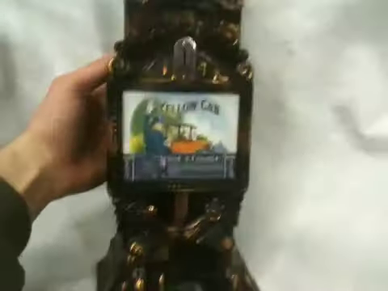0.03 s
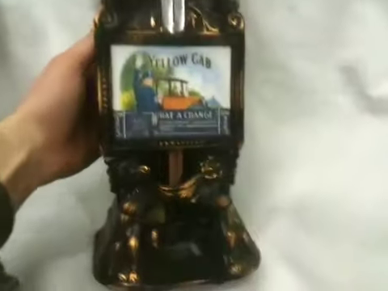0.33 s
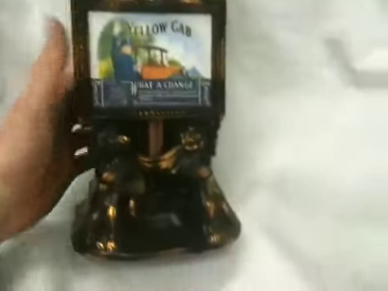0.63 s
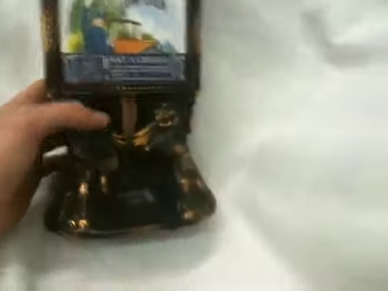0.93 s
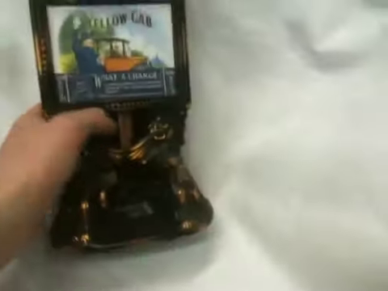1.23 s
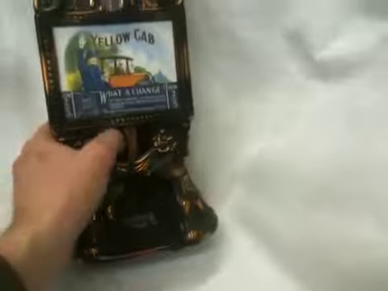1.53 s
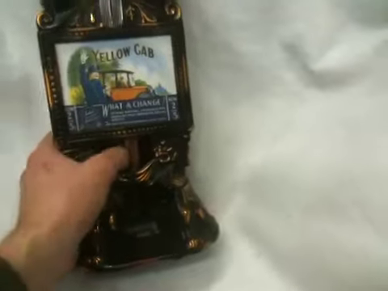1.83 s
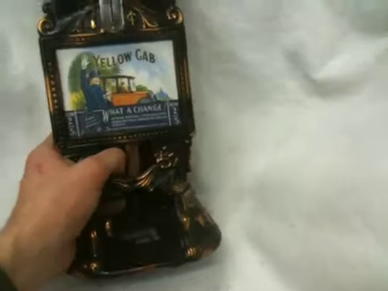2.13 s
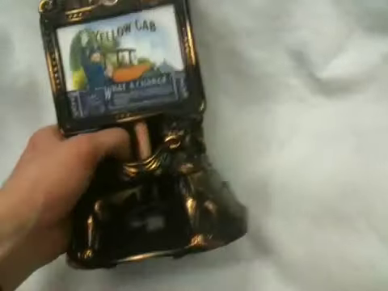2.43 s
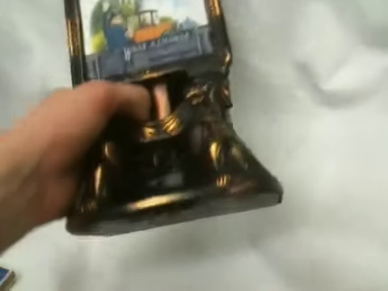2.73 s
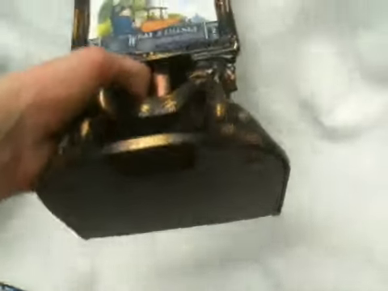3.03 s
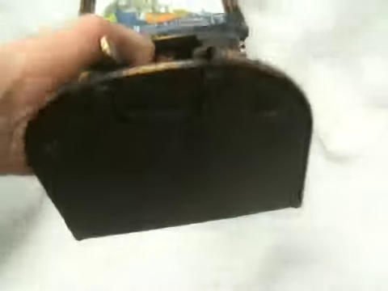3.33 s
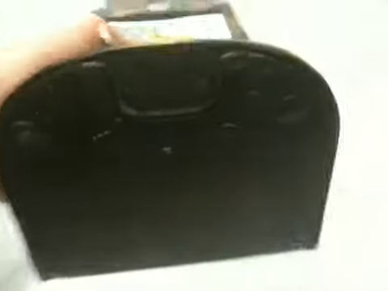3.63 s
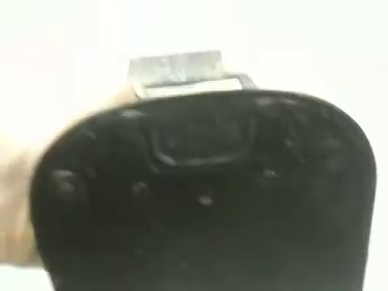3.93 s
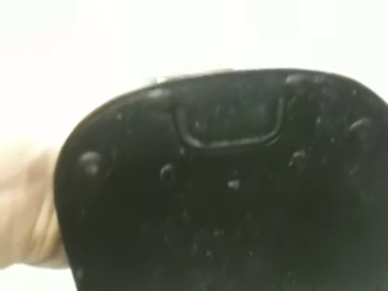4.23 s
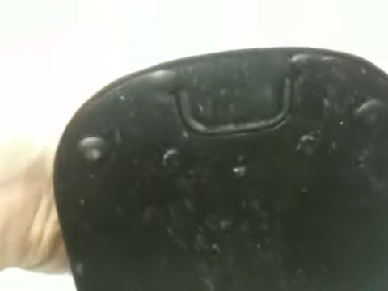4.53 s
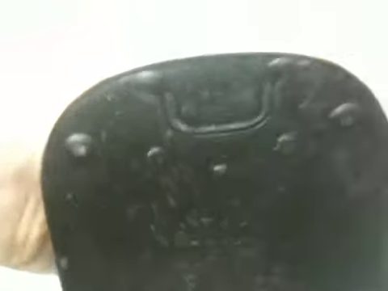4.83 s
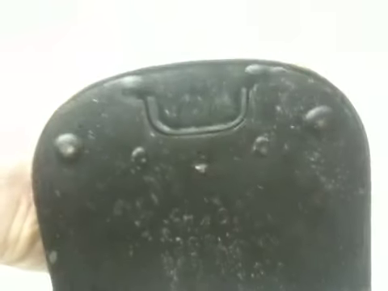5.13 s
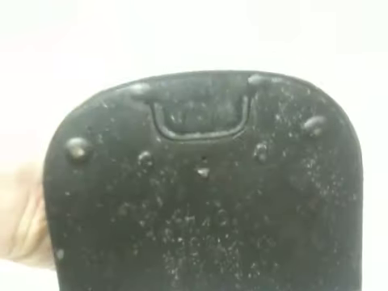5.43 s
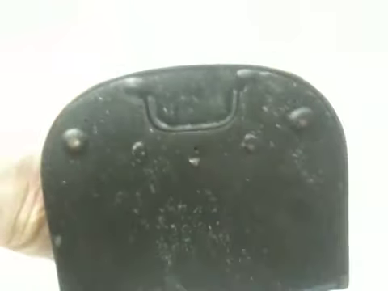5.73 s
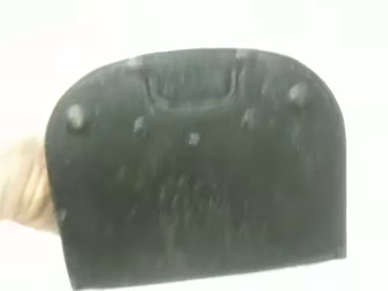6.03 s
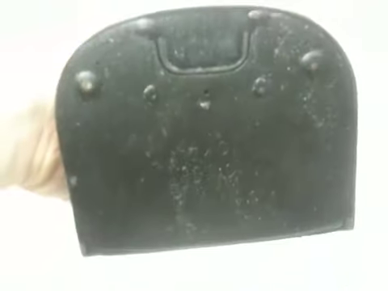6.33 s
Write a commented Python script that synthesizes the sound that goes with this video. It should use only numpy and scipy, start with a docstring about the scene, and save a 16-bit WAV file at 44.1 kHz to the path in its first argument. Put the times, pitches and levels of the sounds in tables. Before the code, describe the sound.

Close to the microphone, a quick metallic rattle comes from inside a small vending machine as someone handles it. Fingers rub and knock lightly on the hollow body. As it tilts, loose steel pieces click and chatter in two bursts, then a heavier part lands with a ringing clunk, the loudest sound. A faint fan and electrical hum run underneath in the small, quiet room.

```python
"""Tipping an old vending machine

An old cast-metal vending machine is gripped and tipped over by hand in a small quiet room.
Loose steel parts inside slide, clink and bounce; at last a heavier piece drops with a hollow clunk.
Fingers bump and rub on the metal body, over a faint fan and mains hum."""
import sys
import numpy as np
from scipy import signal
from scipy.fft import rfft, irfft
from scipy.io import wavfile

SR = 44100
rng = np.random.default_rng(int(sys.argv[2]) if len(sys.argv) > 2 else 0)


def write(x):
    x = np.atleast_2d(x).T
    wavfile.write(sys.argv[1], SR, np.round(np.clip(x, -1, 1) * 32767).astype(np.int16))


N = 286209
TIME = np.arange(N) / SR
RING_TIME = TIME[:int(.5 * SR)].astype(np.float32)   # time axis of one hit or echo

# edges of the pitch bands that a hit stirs more or less, depending on where it lands: f/Hz
BAND_EDGES = [300, 600, 1050, 1900, 2800, 4000, 5500, 8500, 12000, 17000]
BAND_FILTERS = [signal.butter(2, edges, "band", fs=SR, output="sos")
                for edges in zip(BAND_EDGES, BAND_EDGES[1:])]


def from_db(db):
    """Turn decibels into a factor to multiply by."""
    return 10 ** (np.asarray(db) / 20)


def rms(x):
    """The average strength of a sound (root mean square)."""
    return np.sqrt(np.mean(x ** 2) + 1e-24)


def at_hz(points, hz):
    """Read between the rows of a table, with octaves evenly spaced."""
    f, value = np.transpose(points)
    return np.interp(np.log(np.maximum(hz, 1)), np.log(f), value)


def band(x, low_hz, high_hz):
    """Keep the sound between two frequencies."""
    return signal.sosfilt(signal.butter(2, [low_hz, high_hz], "band", fs=SR, output="sos"), x)


def resonate(x, hz, width_hz):
    """Let one frequency through fully and weaken those around it."""
    r = np.exp(-np.pi * width_hz / SR)
    feedback = [1, -2 * r * np.cos(2 * np.pi * hz / SR), r * r]
    return signal.lfilter((1 - r * r) / 2 * np.array([1, 0, -1]), feedback, x)


def fade(t60):
    """A curve that dies away by 60 dB in t60 seconds."""
    rate = np.float32(np.log(1000) / np.maximum(t60, .003))
    return np.exp(-np.minimum(rate * RING_TIME, 30))


def add(out, start_s, sound):
    """Mix a sound in at its start time."""
    at = max(round(start_s * SR), 0)
    out[at:at + len(sound)] += sound[:N - at]


def fan_and_hum(air_db=-66):
    """A fan moves air and keeps the room droning, while mains power hums."""
    # tone colour of the moving air: f/Hz, relative level/dB
    air_colour = [(18, -79), (30, -41), (89, -26.5), (108, -11), (141, -14.5), (179, -4), (216, -9),
                  (330, -15), (409, -12.5), (774, -19), (862, -18), (1820, -24), (4380, -30.5),
                  (15700, -32.5), (17500, -36)]
    # room resonances that the fan stirs: f/Hz, filter width/Hz, level/dB
    drones = [(173.8, 36, -73.5), (433, 68, -73)]
    # mains hum tones: f/Hz, level/dB
    hum_tones = [(119.8, -78.5), (179.6, -74), (360, -79.5)]
    air_gains = from_db(at_hz(air_colour, np.arange(N // 2 + 1) * SR / N))
    air = irfft(rfft(rng.standard_normal(N)) * air_gains, N)
    out = from_db(air_db) * air / rms(air)
    for hz, width_hz, level_db in drones:
        drone = resonate(resonate(rng.standard_normal(N), hz, width_hz), hz, width_hz)
        out += from_db(level_db) * drone / rms(drone)
    for hz, level_db in hum_tones:
        out += from_db(level_db) * np.sqrt(2) * np.sin(2 * np.pi * (hz * TIME + rng.random()))
    return out


def room_echo(sound, build_s=0.0043):
    """A blur of echoes builds up quickly; the high ones die first."""
    # how long the echoes take to fade: f/Hz, t60/s
    fade_times = [(200, 0.55), (1000, 0.55), (3000, 0.44), (7000, 0.28), (16000, 0.2)]
    # how strong the echoes are: f/Hz, level/dB
    echo_levels = [(200, -9.5), (1000, -17), (3000, -17.5), (7000, -19), (16000, -27)]
    edges_hz = np.geomspace(100, 18000, 11)
    response = 0
    for low, high in zip(edges_hz, edges_hz[1:]):
        hz = np.sqrt(low * high)
        shape = fade(at_hz(fade_times, hz)) * (1 - np.exp(-RING_TIME / build_s))
        echoes = rng.standard_normal(len(shape)) * shape / np.linalg.norm(shape)
        response = response + from_db(at_hz(echo_levels, hz)) * band(echoes, low, high)
    return signal.fftconvolve(sound, response)[:N]


def rumble(machine, gain_db=-40, smooth_s=.01):
    """Each hit also shakes the whole body with a faint low thud."""
    shake = band(rng.standard_normal(N), low_hz=20, high_hz=130)
    span = smooth_s * SR
    force = signal.lfilter([1], [1, -np.exp(-1 / span)], np.abs(machine)) / span   # smoothed loudness
    return from_db(gain_db) * force * shake / rms(shake)


def rubs(grain_db=-0.5):
    """Skin and parts slide on metal: many tiny slips make a rasp that swells and dies."""
    # slides: t/s, length/s, level at the middle/dB, f/Hz, filter width/Hz
    slides = [(0.041, 0.31, -57, 1600, 1470), (0.0, 0.31, -56, 478, 128), (0.556, 0.16, -69.5, 1110, 900),
              (0.678, 0.26, -67.5, 1820, 1100), (1.172, 0.22, -64.5, 1620, 1000),
              (2.45, 0.097, -60, 2215, 49.6), (2.755, 0.1, -58, 2130, 2970), (3.159, 0.031, -54, 1144, 199),
              (5.159, 0.043, -42.5, 1750, 700)]
    out = np.zeros(N)
    for start_s, length_s, level_db, hz, width_hz in slides:
        count = min(int(length_s * SR), SR)
        sizes = from_db(grain_db * np.minimum(rng.exponential(1, SR), 2))
        slips = (sizes * rng.standard_normal(SR))[:count]
        rasp = resonate(resonate(slips, hz, width_hz), hz, width_hz)
        swell = np.sin(np.linspace(0, np.pi, count))
        add(out, start_s, from_db(level_db) * rasp / rms(rasp) * swell)
    return out


def band_levels(colour, level_db, brightness, ping_db, ping_hz, ping_octaves):
    """Each band's level in dB, from a hit's loudness, brightness and ping (one range raised or cut)."""
    hz = np.sqrt(np.multiply(BAND_EDGES[:-1], BAND_EDGES[1:]))
    tilt = brightness * np.log2(hz / 3000)
    ping = ping_db * np.exp(-.5 * (np.log2(hz / ping_hz) / ping_octaves) ** 2)
    return level_db + at_hz(colour, hz) + tilt + ping


def metal_hit(tones, levels_db, rise_s, clatter_t60, crack_db, clatter_db, crack_t60=0.034):
    """Struck metal gives a crack, a clatter of countless blurred tones, and a few clear ones."""
    hz, tone_db, t60 = np.transpose(tones)[:, :, None]
    # the parts sit a little differently each time, so each tone's pitch and strength vary
    hz = np.float32(hz * (1 + .0015 * rng.standard_normal(hz.shape)))
    strength = from_db(tone_db + 3 * rng.standard_normal(hz.shape))
    cycles = hz * RING_TIME + np.float32(rng.random(hz.shape))
    ring = np.sum(np.float32(strength) * fade(t60) * np.sin(2 * np.pi * cycles), axis=0)
    crack = from_db(crack_db) * fade(crack_t60)
    clatter = from_db(clatter_db) * fade(clatter_t60)
    noise = rng.standard_normal(len(RING_TIME)) * (crack + clatter)
    swell = 1 - np.exp(-RING_TIME / max(rise_s, 1e-5))
    contact = (ring + noise) * swell
    attack = int(.012 * SR)   # each band's level is set over this opening stretch
    out = 0
    for sos, level_db in zip(BAND_FILTERS, levels_db):
        part = signal.sosfilt(np.vstack([sos, sos]), contact)   # twice, so neighbouring bands join in step
        out = out + from_db(level_db) * part / rms(part[:attack])
    return out


def clunks():
    """Fingers and a heavier loose piece knock on the hollow body and make it ring."""
    # knocks: t/s, base level/dB, brightness/(dB per octave), ping/dB, rise time/s
    knocks = [(0.583, -71.5, -3, -3, .02), (1.322, -56.5, -1.7, -4.5, 0.0055), (1.367, -76, -6, -7, .003),
              (1.513, -68, 1, -5, .0025), (1.971, -68.5, -0.5, -3, .003), (2.166, -65.5, -3, -8.5, 0.00086),
              (4.612, -76.5, -4.5, -14, .0018), (5.101, -63.5, -2.5, 2.5, .003),
              (5.171, -51, 0.5, 6.5, 0.00088), (5.191, -55, 1.5, 9, .0013), (5.2185, -32, 3, 10.5, 0.0015),
              (5.282, -45.5, 0, 4, .0011)]
    # ringing tones of the hollow body: f/Hz, relative level/dB, t60/s
    body_tones = [(448, -7.5, 0.22), (518, -7.5, 0.179), (721, -6, 0.076), (849, -5.5, 0.11),
                  (994, -19.5, 0.033), (1140, 0.5, 0.074), (1395, 10.5, 0.049), (1556, 4, 0.048),
                  (2190, -36.5, 0.079), (2430, -12.5, 0.041), (3170, -13, 0.12), (3670, -11, 0.078)]
    # tone colour of every clunk: f/Hz, relative level/dB
    colour = [(425, -8.5), (790, -4), (1410, -1), (2300, -7.5), (3350, -10), (4690, -15), (6840, -17),
              (10100, -27), (14280, -16)]
    out = np.zeros(N)
    for start_s, level_db, brightness, ping_db, rise_s in knocks:
        levels = band_levels(colour, level_db, brightness, ping_db, ping_hz=1356, ping_octaves=0.34)
        clunk = metal_hit(body_tones, levels, rise_s, clatter_t60=0.15, crack_db=3.5, clatter_db=9)
        add(out, start_s, clunk)
    return out


def clink(level_db, brightness, ping_db, ping_hz, clatter_t60):
    """One steel part strikes: a hard hit snaps, a weak glancing one swells more slowly."""
    # ringing tones of the steel parts: f/Hz, relative level/dB, t60/s
    steel_tones = [(455, -6, .2), (1075, -19, .8), (1120, -1, .09), (1210, -3, .08), (1645, 0, .08),
                   (1770, -2, .07), (2222, 1, .14), (2445, 0, .08), (2530, -1, .08), (2960, 0, .11),
                   (3350, -2, .1), (3840, 0, .08), (4105, 0, .09), (4415, 6, .08), (4490, 3, .07),
                   (4615, 3, .09), (4722, 1, .1), (5598, -2, .12), (6025, -3, .09), (6897, 4, .11),
                   (7103, 3, .1), (7190, 2, .07), (7345, 0, .09), (7660, -1, .09), (7920, 2, .12),
                   (8825, -2, .09), (12950, 1, .06), (13386, 1, .11), (14680, 0, .14), (16110, 3, .07)]
    # tone colour of every clink: f/Hz, relative level/dB
    colour = [(425, -18), (790, -10.5), (1410, -2), (2300, -1), (3350, -3), (4690, -6.5), (6840, -3),
              (10100, -3.5), (14280, -1.5)]
    levels = band_levels(colour, level_db, brightness, ping_db, ping_hz, ping_octaves=0.39)
    hard_hit_db, hard_rise_s = -39.5, 0.00025
    rise_s = hard_rise_s * 2 ** ((hard_hit_db - level_db) / 9)   # doubles for every 9 dB weaker
    return metal_hit(steel_tones, levels, rise_s, clatter_t60, crack_db=11.5, clatter_db=10)


def loose_parts(bounces=3, gap_s=.016, gap_scatter=.25):
    """Small steel parts hit their stops, then chatter in a few weaker, duller bounces."""
    # strikes: t/s, base level/dB, brightness/(dB per octave), ping/dB, ping f/Hz, clatter t60/s
    strikes = [(0, -39.5, -1, 12.5, 14000, 0.12), (0.0068, -43, 2.5, 12, 1780, 0.2),
               (0.0333, -39.5, 2.5, 10, 1760, 0.13), (0.063, -50, -2.5, 12, 14000, 0.12),
               (0.098, -46.5, 1.5, 9.5, 1760, 0.14), (0.26, -61, -4, 11, 14000, 0.064),
               (2.498, -66.5, -1.5, 2.5, 2430, .09), (2.8287, -38, 1.6, 8, 6600, .058),
               (2.888, -52.5, -2, 19, 5350, .09), (2.906, -38.5, 2, 12, 5320, .11),
               (2.956, -49.5, 0, 4, 5500, 0.15), (2.991, -54, 0, 3, 4500, .09),
               (3.185, -62, -1.5, 4, 2400, 0.088), (3.709, -63, 0.5, 8, 7000, 0.23),
               (3.7339, -49.5, 4.5, 6, 5500, .067), (3.739, -50, -1, 10.5, 5000, 0.31),
               (3.7816, -43, 2.5, 8.5, 4060, 0.11), (3.825, -54.5, -2.5, 5, 980, 0.075),
               (4.0574, -52.5, -2.5, 5.5, 3600, .12), (4.0736, -48, 2.5, 9.5, 1140, 0.24),
               (4.107, -43, 0.4, 12.5, 4800, 0.099), (4.1497, -45, 2, 6.5, 5530, 0.079),
               (5.236, -47.5, -1, 2, 14000, .11), (5.273, -50, -1.5, 4, 1000, 0.12)]
    first_loss_db, next_loss_db, dulling_db_per_octave = 12, 5.5, 2.5
    out = np.zeros(N)
    for start_s, level_db, brightness, ping_db, ping_hz, t60 in strikes:
        add(out, start_s, clink(level_db, brightness, ping_db, ping_hz, t60))
        bounce = clink(level_db - first_loss_db, brightness - dulling_db_per_octave, ping_db, ping_hz, t60)
        gaps = gap_s * (1 + gap_scatter * rng.uniform(-1, 1, bounces))
        for k, delay_s in enumerate(np.cumsum(gaps)):
            add(out, start_s + delay_s, from_db(-next_loss_db * k) * bounce)
    return out


def scene():
    """The machine close by, with the room around it, in one channel."""
    machine = loose_parts() + clunks() + rubs()
    return (machine + rumble(machine) + room_echo(machine) + fan_and_hum())[None]


def record(dry, cutoff_hz=17400):
    """Cut off the very highest treble steeply."""
    return signal.sosfilt(signal.ellip(10, .1, 70, cutoff_hz, fs=SR, output="sos"), dry)


dry = scene()
out = record(dry)
write(out)
```